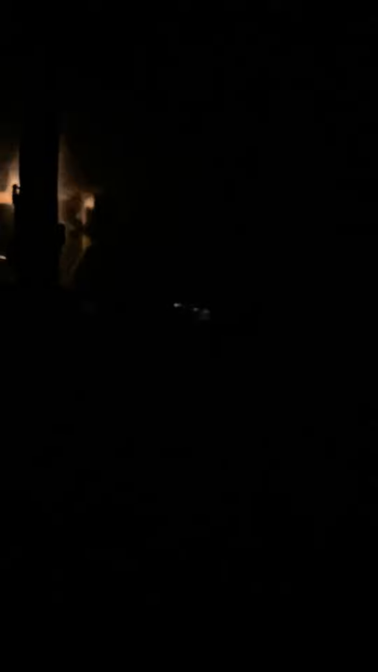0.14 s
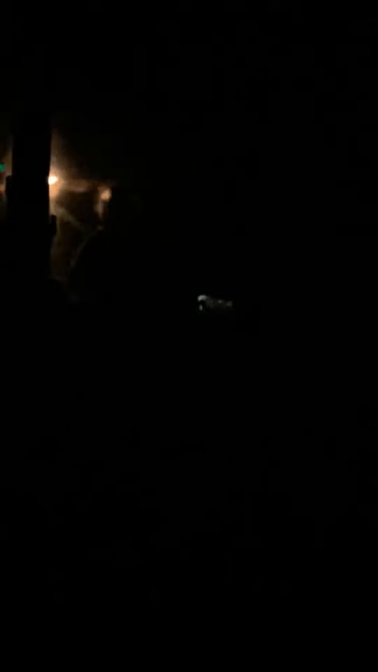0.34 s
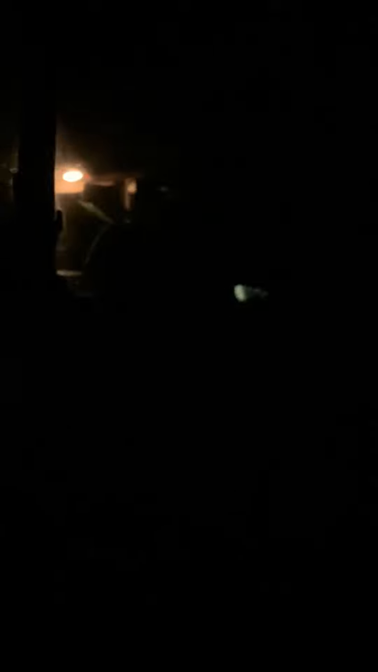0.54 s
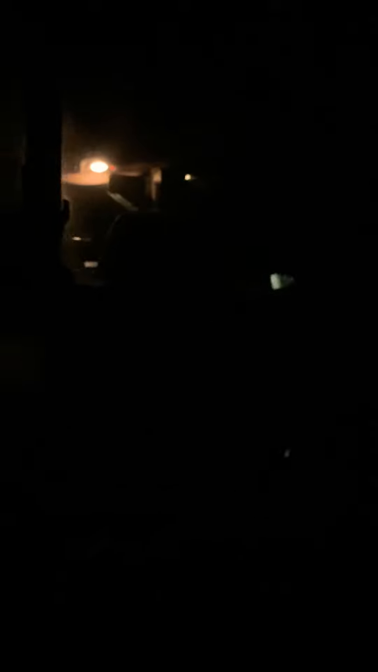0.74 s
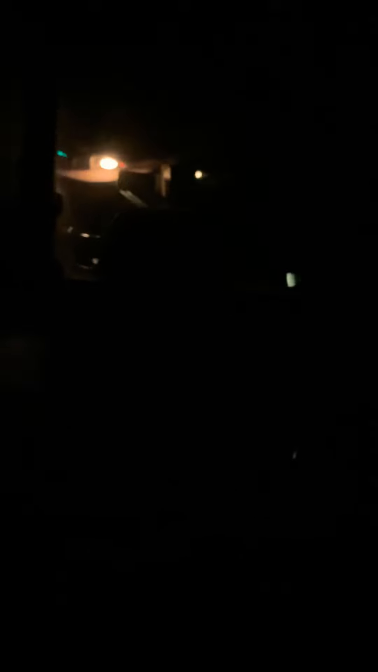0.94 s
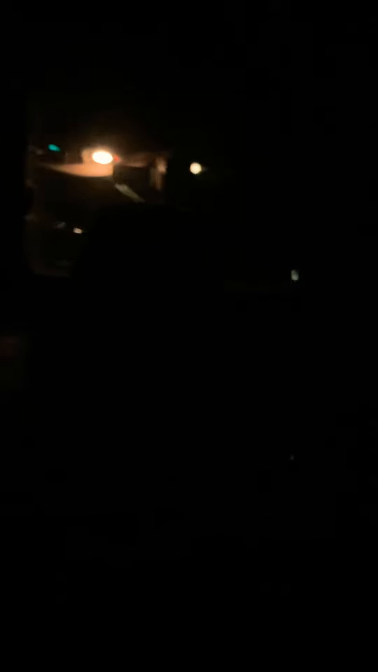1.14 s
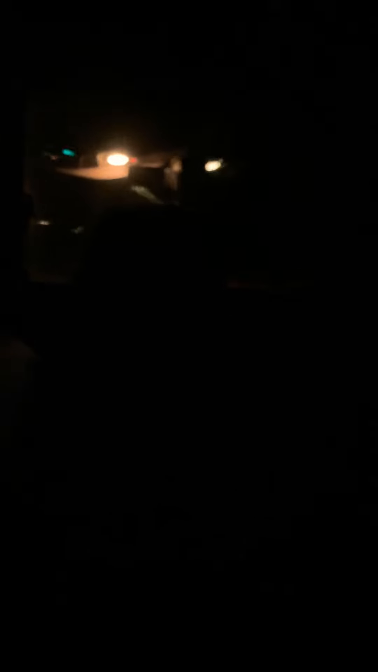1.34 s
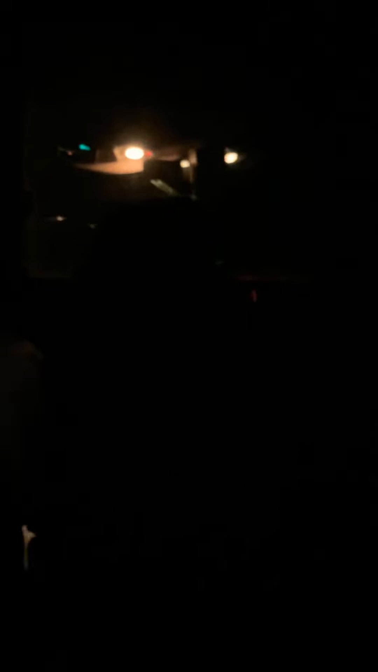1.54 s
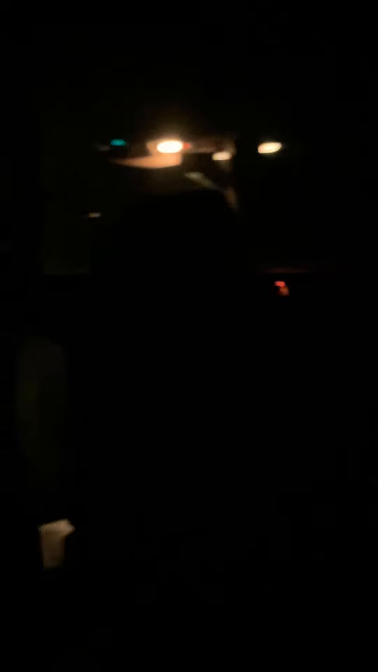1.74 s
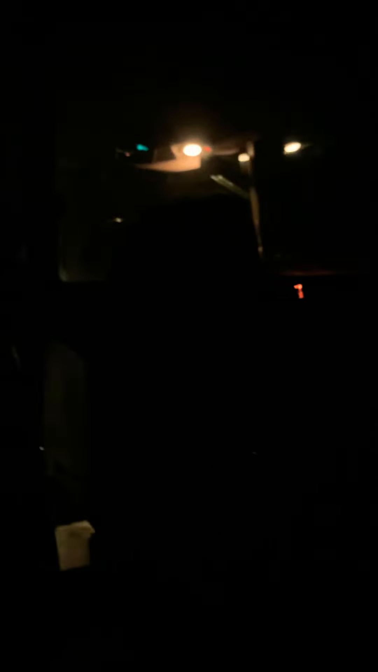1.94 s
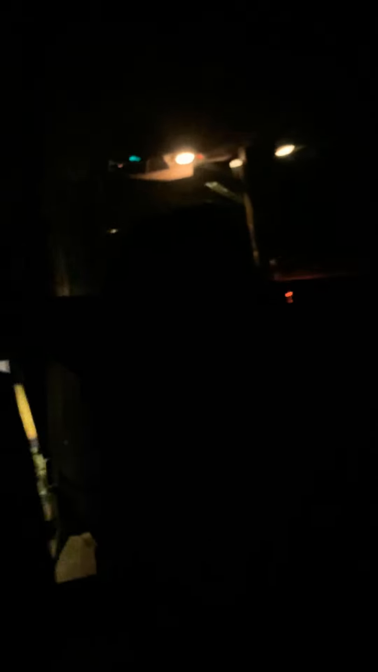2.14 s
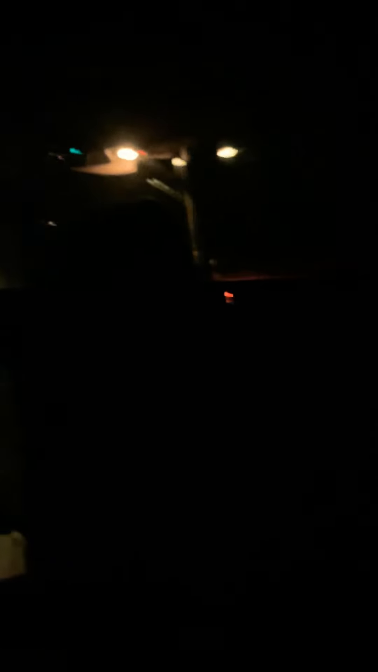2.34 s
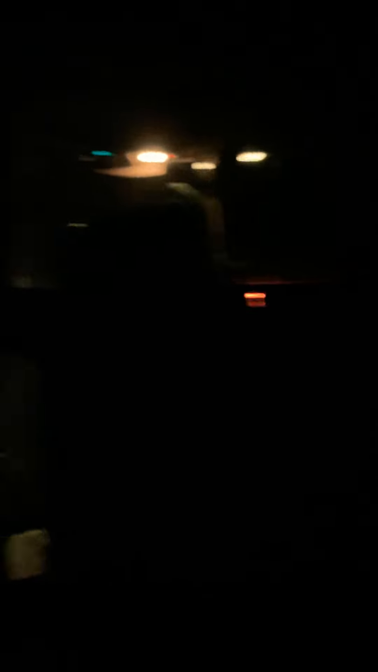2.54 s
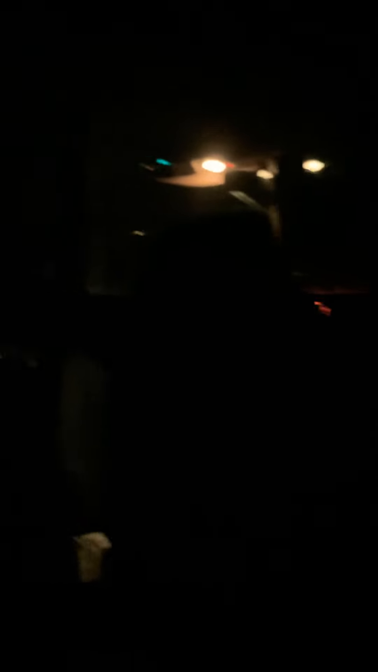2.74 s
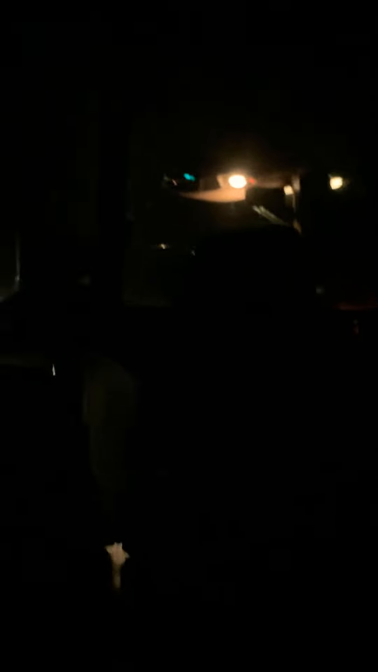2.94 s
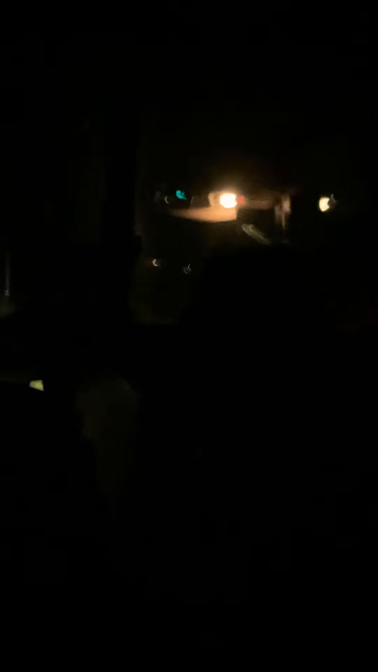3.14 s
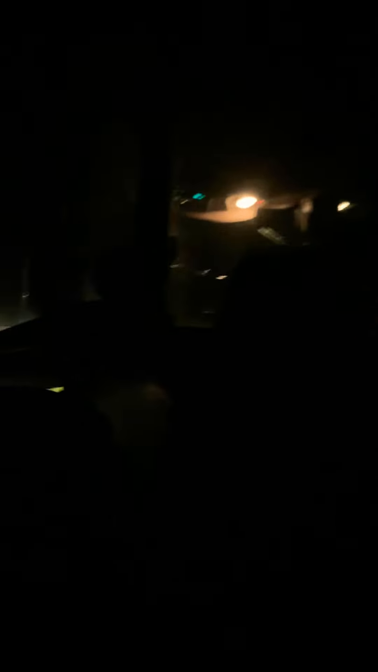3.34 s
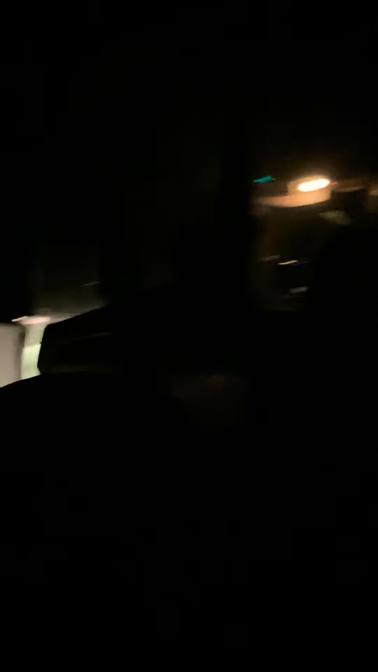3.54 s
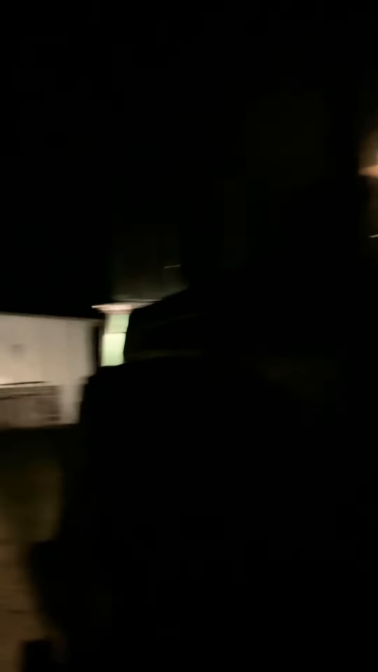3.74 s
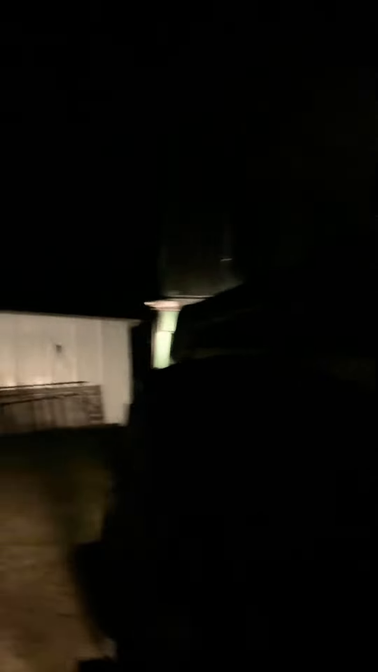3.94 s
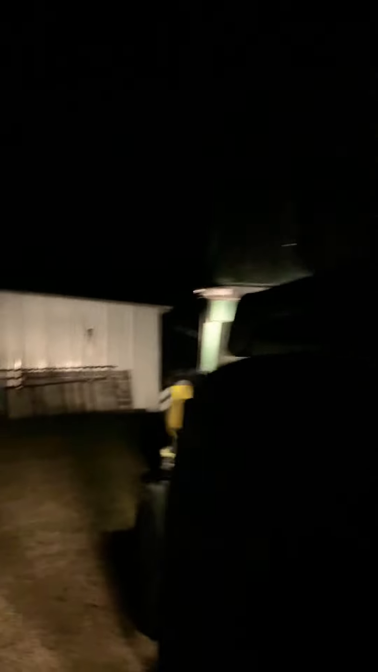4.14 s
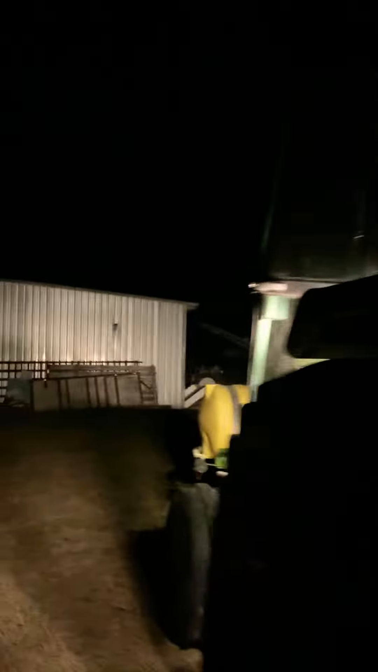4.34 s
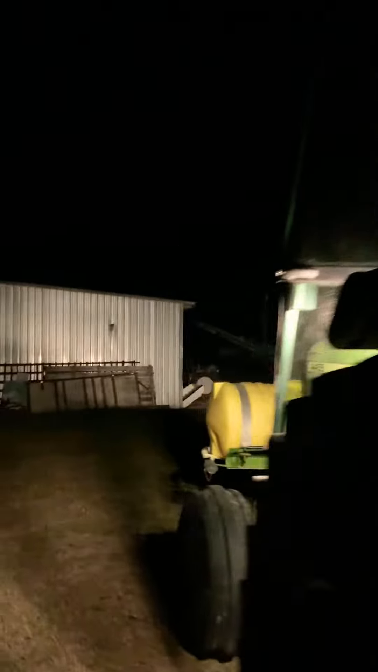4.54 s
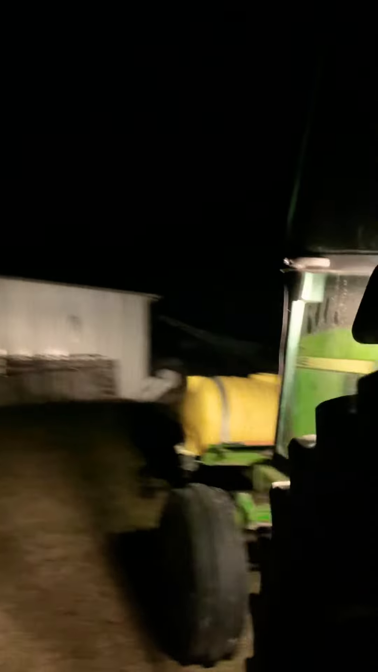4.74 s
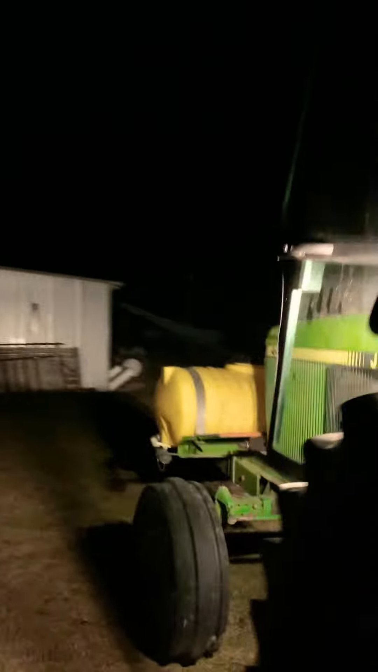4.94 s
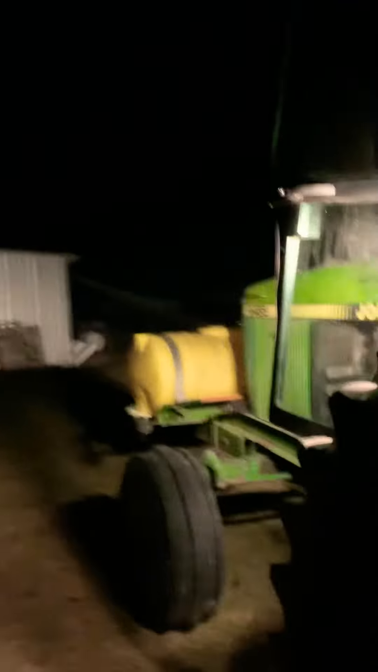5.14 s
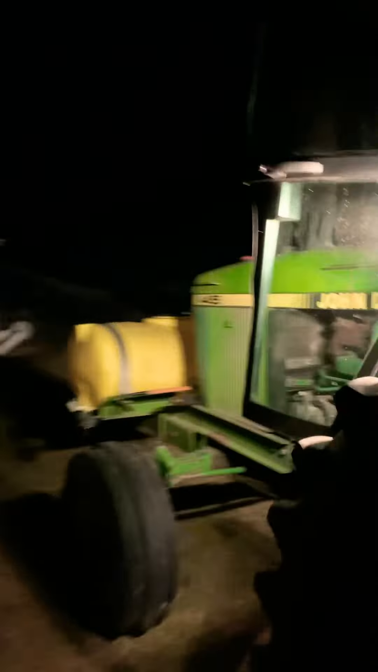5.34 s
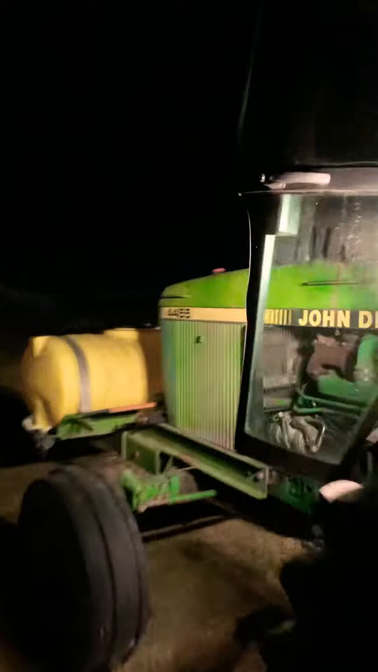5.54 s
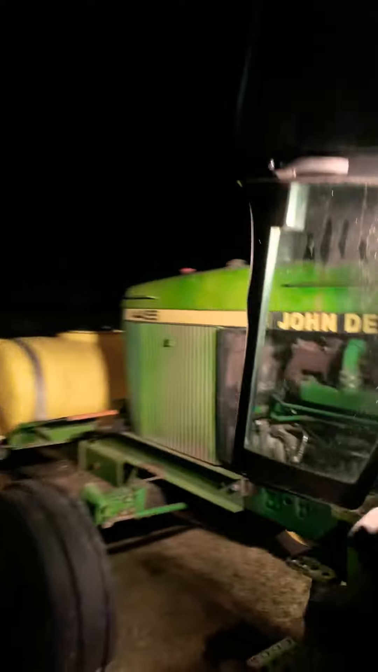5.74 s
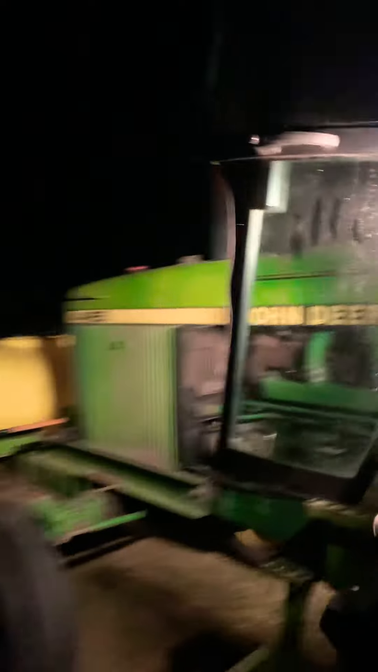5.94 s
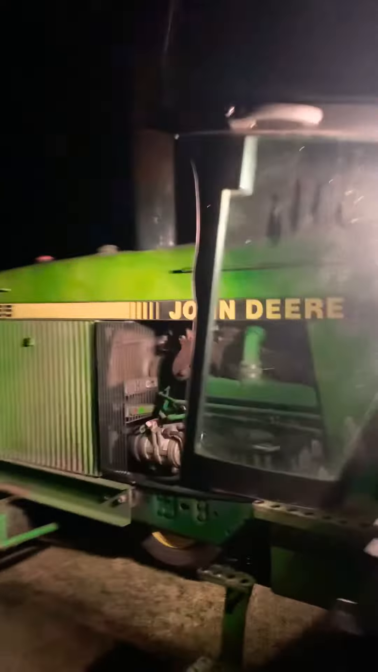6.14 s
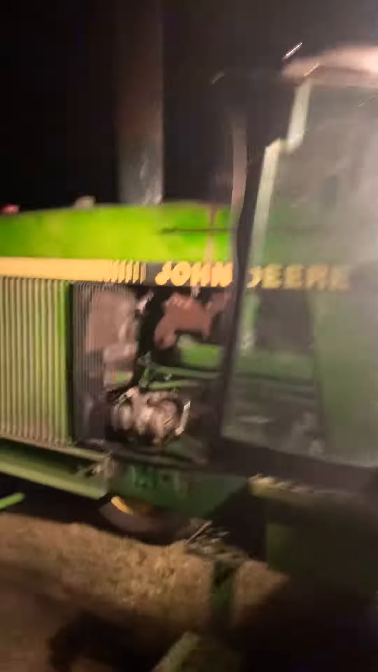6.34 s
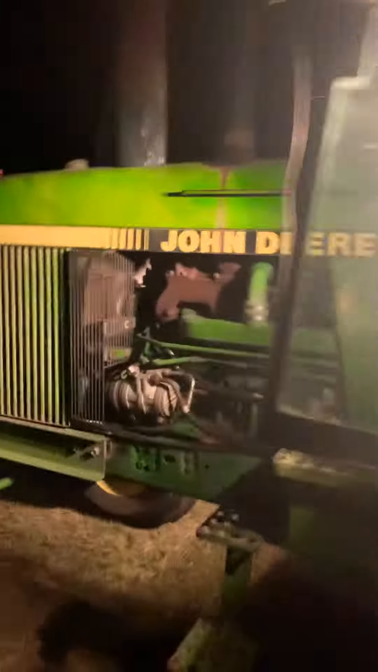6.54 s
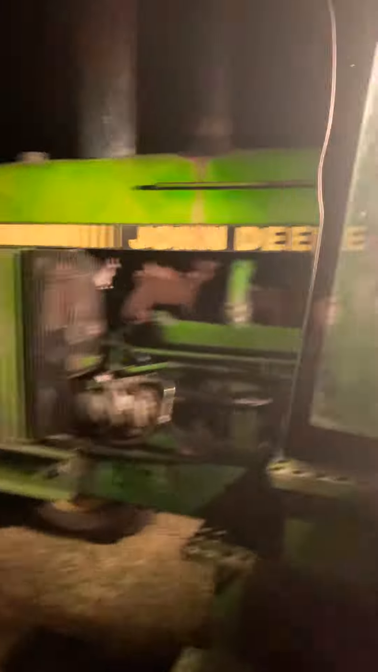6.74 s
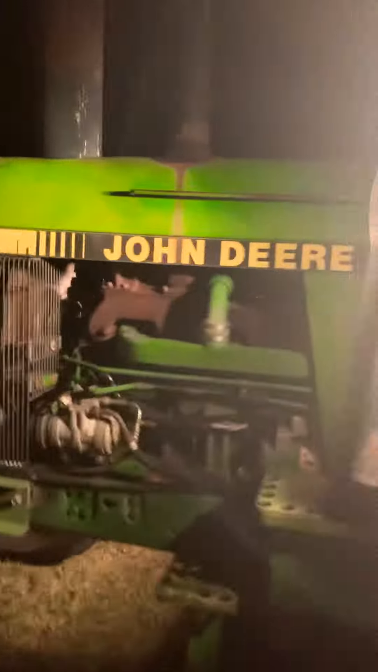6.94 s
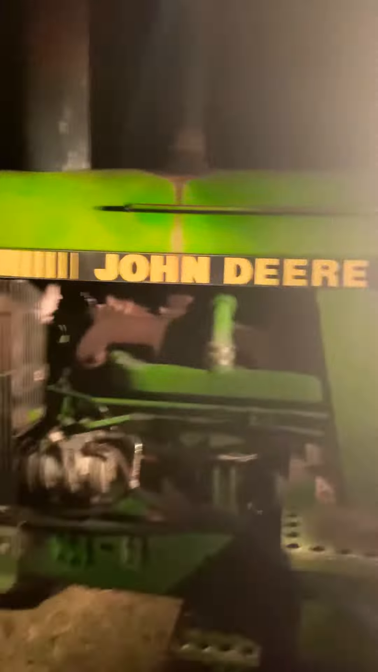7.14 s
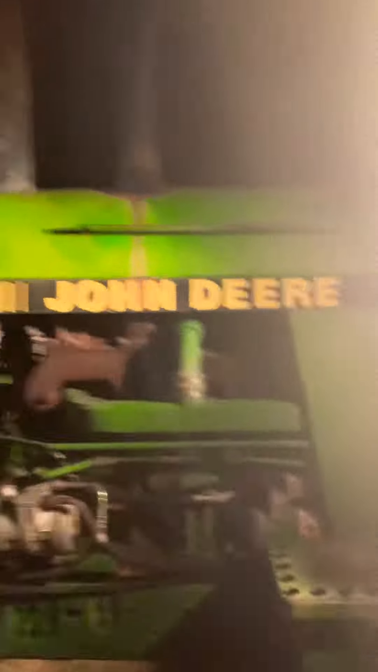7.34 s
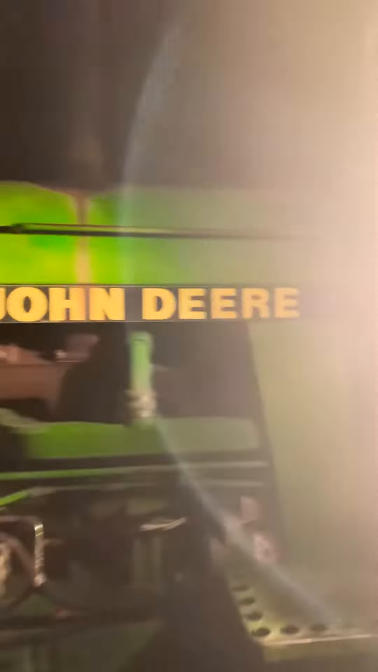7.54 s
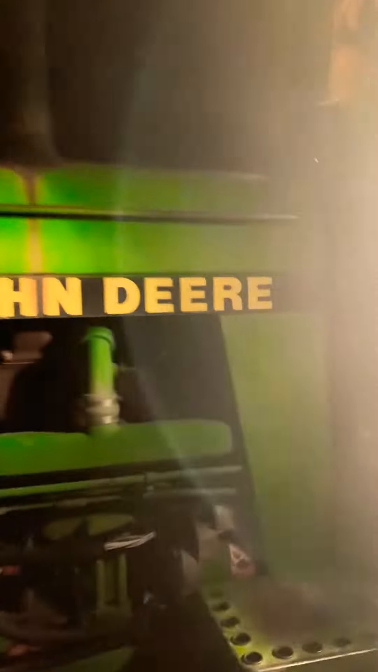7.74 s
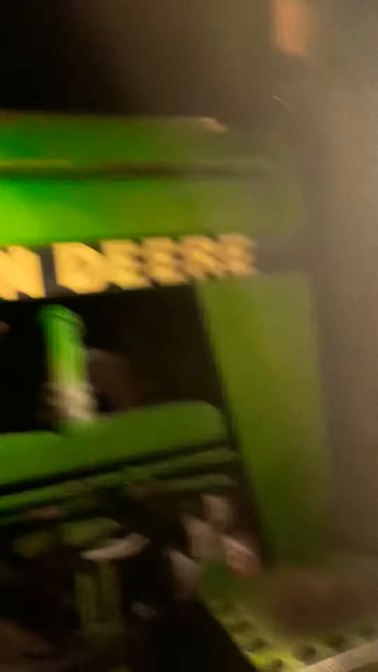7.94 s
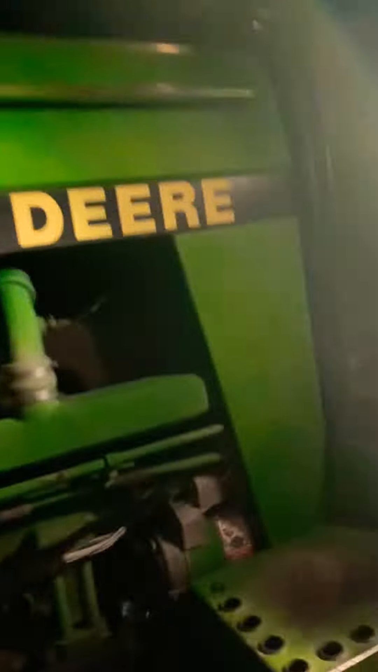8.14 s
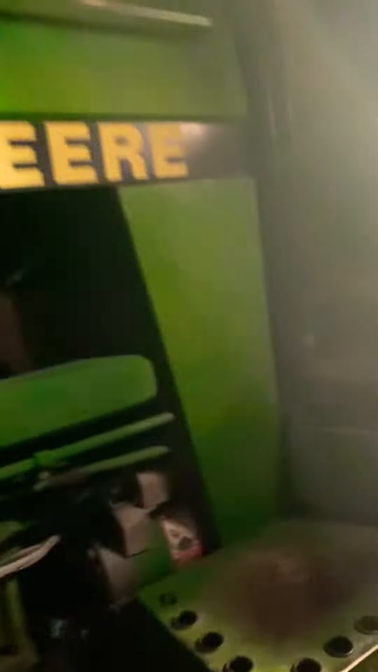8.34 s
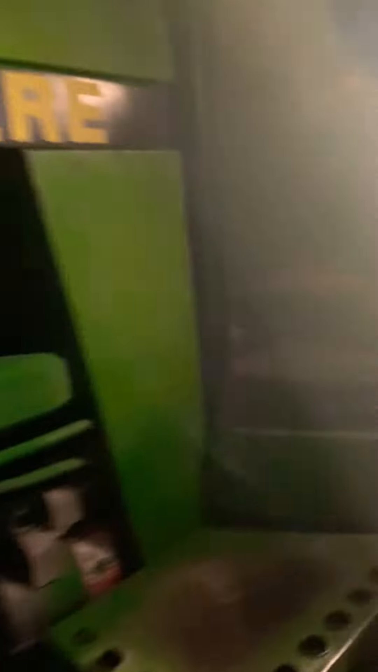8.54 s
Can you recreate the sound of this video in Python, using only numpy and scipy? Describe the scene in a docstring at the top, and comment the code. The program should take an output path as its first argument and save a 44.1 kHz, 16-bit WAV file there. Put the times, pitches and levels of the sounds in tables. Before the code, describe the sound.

A six-cylinder diesel tractor idles at an almost constant slow speed throughout, in an open yard at night, heard on a handheld phone with two closely spaced microphones. From 0 to about 3.5 s the phone is roughly four metres away behind the machine: a low exhaust drone, deep rumble, dull rapid knocking and distant pump rattle, with a wavering gear whine. Between 4 and 5.5 s it moves past the wheel and cab; the low boom rises while the rattle is partly screened, and hollow panel resonances swell briefly. From about 6 s the open engine bay is near: louder, harder knocks, dull piston slap, injector ticking and bright valve clatter. From 6.5 s sharp pump snaps recur about six times a second, with small metallic clinks near 7, 7.9, 8.2 and 8.5 s. The idle is still running when it cuts off around 8.6 s.

```python
"""An exhaust drone over a deep rumble: a six-cylinder diesel tractor idles in a yard at night.
A phone is carried from behind it up to the engine; most layers grow as the distance shrinks.
Crank-locked tones make the drone, gear whine and hums; noise bursts at set crank angles make the rumble,
knock, pump rattle and, close by, piston slap, injector ticks and valve clatter. Noise makes a faint hiss,
snaps and clinks; decaying sines make the hard knocks. Two closely spaced microphones pick it up."""
import sys
import numpy as np
from scipy import signal
from scipy.fft import rfft, irfft, next_fast_len
from scipy.io import wavfile
from scipy.ndimage import map_coordinates

SR = 44100
rng = np.random.default_rng(int(sys.argv[2]) if len(sys.argv) > 2 else 0)


def wav_out(sig):
    """Save sig, one row per channel (or a flat mono array), as 16-bit PCM at SR to the path in sys.argv[1]."""
    wavfile.write(sys.argv[1], SR, np.round(np.clip(np.atleast_2d(sig).T, -1, 1) * 32767).astype(np.int16))


N = 377937
TIME = np.arange(N) / SR


def amp(db):
    """Decibels to gain."""
    return 10 ** (np.asarray(db) / 20)


def unit(x):
    """Scale to rms 1."""
    return x / np.sqrt(np.mean(x ** 2) + 1e-20)


def along(points, hz):
    """Read (frequency [Hz], value) points on a log frequency axis."""
    f, v = np.transpose(points)
    return np.interp(np.log(hz + 1), np.log(f + 1), v)


def curve(points):
    """Interpolate (time [s], value) points to one value per sample."""
    return np.interp(TIME, *np.transpose(points))


def bell(x, centre, half):
    """Gaussian hump of height 1, down to 1/e at half from the centre."""
    return np.exp(-((x - centre) / half) ** 2)


def wobble(rate_hz):
    """Smooth random curve with rate_hz knots per second."""
    coarse_s = TIME[::64]
    knots = rng.standard_normal(int(N * rate_hz / SR) + 4)
    return np.interp(TIME, coarse_s, map_coordinates(knots, [coarse_s * rate_hz]))


def filtered(x, response):
    """Multiply the spectrum of x by a response of frequency."""
    size = next_fast_len(N + SR // 2)
    hz = np.fft.rfftfreq(size, 1 / SR)
    return irfft(rfft(x, size) * response(hz), size)[..., :N]


def coloured(x, spectrum):
    """Filter x by (frequency [Hz], level [dB]) points, then scale to rms 1."""
    return unit(filtered(x, lambda hz: amp(along(spectrum, hz))))


# the walk: (time [s], distance to the engine [m])
DISTANCE_M = [(0, 4.3), (2.3, 3.94), (3.4, 3.6), (4.3, 2.82), (5.2, 2.15), (6.1, 1.43), (7, 1.02),
              (7.4, 1.17), (7.8, 1.22), (8.57, 1.28)]


def spreading(near_db, loss_db):
    """Gain along the walk: near_db at 1 m, loss_db lost per doubling of the distance."""
    return amp(near_db - loss_db * np.log2(curve(DISTANCE_M)))


# how openly the engine bay faces the phone: (time [s], share [0-1])
OPEN_SHARE = [(0, 0), (3.5, .03), (4.2, 0.11), (4.7, 0.25), (5.4, 0.35), (6.2, 0.75), (7, 0.95),
              (8.57, 0.88)]


def approach(far, near):
    """Power blend from the sound behind the tractor to the sound beside the engine."""
    share = np.clip(curve(OPEN_SHARE), 0, 1)
    return np.sqrt(1 - share) * far + np.sqrt(share) * near


def reflections(x, depth_db, width_hz, life_s):
    """Crossing reflections lift and sink narrow bands at random; the pattern drifts with time."""
    hz, t, z = signal.stft(x, SR, nperseg=2048)
    knots = rng.standard_normal((1200, 80))
    places = np.meshgrid(hz / width_hz, t / life_s, indexing="ij")
    field = map_coordinates(knots, places, order=2, mode="mirror")
    shaped = signal.istft(z * amp(depth_db * field), SR, nperseg=2048)[1]
    return unit(shaped[:, :N])


def blows(cycle, pattern, t60_s, rise_s, alike, scatter_db, wash_db):
    """Noise bursts at fixed crank angles over a steady wash, on two paths; each cycle resembles the last."""
    size = SR // 6
    t = np.arange(size) / SR
    burst = (1 - np.exp(-t / rise_s)) * amp(-60 * t / t60_s)
    cycles = int(cycle[-1]) + 1
    power = np.zeros(N + size)
    for angle_deg, db in pattern:
        for turn in np.arange(cycles) + angle_deg / 720:
            start = np.searchsorted(cycle, turn)
            gain = amp(db + scatter_db * rng.standard_normal())
            power[start:start + size] += (gain * burst) ** 2
    envelope = np.sqrt(power[:N] / power[:N].mean() + amp(wash_db) ** 2)
    # likeness between cycles draws fine spectral lines about 6 Hz apart
    alike = np.clip(alike, 0, .95)
    shapes = rng.standard_normal((cycles, 2, size))
    for k in range(1, cycles):
        shapes[k] = alike * shapes[k - 1] + np.sqrt(1 - alike ** 2) * shapes[k]
    position = (cycle % 1 * size).astype(int)
    noise = shapes[cycle.astype(int), :, position].T
    return unit(envelope * noise)


def tone(cycle, order, waver_db, drift_rad, rate_hz):
    """Sine at a multiple of the cycle rate, unsteady in level and phase, at rms 1."""
    phase = 2 * np.pi * (np.round(order) * cycle + rng.random()) + drift_rad * wobble(rate_hz)
    return unit(np.sin(phase) * amp(waver_db * wobble(rate_hz)))


def ringing(modes):
    """Decaying sines of some modes after one blow, with peak 1."""
    t = np.arange(SR // 10) / SR
    modes_sum = sum(amp(db - 60 * t / t60_s) * np.sin(2 * np.pi * hz * t) for hz, t60_s, db in modes)
    ring = (1 - np.exp(-t / .002)) * modes_sum
    return ring / np.abs(ring).max()


def struck(events, rise_s, life_s):
    """Envelope of single blows, each rising and dying away exponentially."""
    envelope = np.zeros(N)
    for s, db in events:
        age = np.maximum(TIME - s, 0)
        envelope += amp(db) * (np.exp(-age / life_s) - np.exp(-age / life_s - age / rise_s))
    return envelope


# idle speed: (time [s], speed [rev/min])
SPEED_RPM = [(0, 720.3), (2.2, 718.5), (3.8, 722.3), (6.2, 721.1), (8.57, 720.8)]


def crank():
    """Engine cycles elapsed; one four-stroke cycle takes two turns."""
    return np.cumsum(curve(SPEED_RPM)) / (2 * 60 * SR)


# third firing harmonic: (time [s], level [dB])
BOOM = [(4.15, -31.5), (4.9, -23.5), (6.1, -21.5), (6.9, -23.5), (7.7, -23.5), (8.05, -27), (8.35, -21.5),
        (8.57, -27)]
# lines between the firing harmonics from unequal cylinders: (multiple of the cycle rate, level [dB])
UNEVEN = [(8, -44), (9, -40.5), (10, -46.5), (16, -40), (17, -44), (19, -45), (20, -41)]
BEAT_DB, BEAT_PERIOD_S, BEAT_CREST_S = -43, 0.823, 2.005


def exhaust(cycle):
    """Six firings a cycle leave the muffler as low harmonics; a line just beside the third beats with it."""
    first = amp(-39.0) * tone(cycle, order=6, waver_db=3.5, drift_rad=.1, rate_hz=12)
    second = tone(cycle, order=12, waver_db=1.0, drift_rad=.06, rate_hz=14)
    second = spreading(near_db=-20, loss_db=6.9) * second
    third = signal.hilbert(tone(cycle, order=18, waver_db=0.7, drift_rad=0.069, rate_hz=14))
    slip = np.exp(-2j * np.pi * (TIME - BEAT_CREST_S) / BEAT_PERIOD_S)
    throb = np.real(third * (amp(curve(BOOM)) + amp(BEAT_DB) * slip))
    lope = sum(amp(db) * tone(cycle, order=k, waver_db=2, drift_rad=0.6, rate_hz=5) for k, db in UNEVEN)
    return first + second + throb + lope


# thumps in one cycle: (crank angle [deg], relative level [dB])
FIRINGS = [(55, -4), (180, -4.5), (305, -5.5), (420, -4.5), (548, -5.5), (660, -5)]
# rumble spectra behind and beside the engine: (frequency [Hz], level [dB])
RUMBLE_FAR = [(70, -44), (135, 0), (175, -2.5), (200, -3), (250, 0), (305, 1), (345, -5.5), (385, -5.5),
              (440, -2.5), (500, -8.5), (750, -63)]
RUMBLE_NEAR = [(70, -19), (135, 2.5), (175, 2.5), (200, -2.5), (250, -5), (305, -5), (345, 2), (385, -5),
               (440, 4), (500, -1), (750, -37.5)]


def block(cycle):
    """Each firing thumps the block and hood."""
    thumps = blows(cycle, FIRINGS, t60_s=.09, rise_s=.003, alike=.66, scatter_db=.5, wash_db=3.5)
    return amp(-1.36) * approach(coloured(thumps, RUMBLE_FAR), coloured(thumps, RUMBLE_NEAR))


# prominent gear tones and engine harmonics, relative to the rumble's distance gain:
# (multiple of the cycle rate, level from behind [dB], level beside the engine [dB])
GEARS = [(30, -14, -18), (36, -14.5, -21), (41, -14, -25), (42, -16, -19), (50, -14, -27), (52, -13, -17),
         (58, -28, -20), (68, -15, -17), (77, -29, -15)]
# timing gear whine: (time [s], level [dB])
WHINE = [(0, -39), (.4, -37.5), (1, -49), (1.8, -40), (2.3, -34.5), (3, -49), (3.35, -40), (3.75, -48),
         (4.1, -34), (6.3, -35.5), (7, -31), (7.5, -35), (8.3, -31)]


def gears(cycle):
    """Meshing tones and engine harmonics waver; the timing gears' whine comes and goes along the walk."""
    lines = np.zeros(N)
    for k, far_db, near_db in GEARS:
        line = tone(cycle, order=k, waver_db=2.5, drift_rad=0.45, rate_hz=2.96)
        lines += approach(amp(far_db), amp(near_db)) * line
    whine = amp(curve(WHINE)) * tone(cycle, order=76, waver_db=2, drift_rad=.5, rate_hz=7)
    return spreading(near_db=-21.5, loss_db=2.71) * lines + whine


# ringing modes of the block: (frequency [Hz], t60 [s], level [dB])
IRON = [(885, 0.046, -13.5), (979, .05, -10.5), (1168, 0.044, -19), (1414, .04, -20.5),
        (1602, 0.061, -14.5), (1639, 0.073, -13.5), (2340, 0.073, -23)]


def rung(x):
    """Pass x through the ringing modes of the iron, at rms 1."""
    return unit(signal.fftconvolve(x, ringing(IRON)[None], axes=1)[:, :N])


# knocks in one cycle: (crank angle [deg], relative level [dB])
KNOCKS = [(45, 0.5), (150, 0.5), (182, -1), (290, -4), (400, -2), (530, -1), (648, 0)]
# knock spectra behind and beside the engine: (frequency [Hz], level [dB])
KNOCK_FAR = [(380, -32), (550, 2), (650, -2), (780, -4), (950, -1), (1150, -4), (1400, -6), (1630, -6),
             (1850, -11.5), (2050, -8.5), (2330, -8), (3200, -85)]
KNOCK_NEAR = [(380, -60), (550, 0.5), (650, 3), (780, -5), (950, -1.5), (1150, -4.5), (1400, -1.5),
              (1630, -6), (1850, -4), (2050, -9), (2330, -7), (3200, -72)]
# the rear wheel and cab screen the engine as the phone passes; the rattle loses most
SHADOW_S, SHADOW_HALF_S = 4.93, 1
KNOCK_SHADOW_DB, RATTLE_SHADOW_DB = -3, -7.5


def knock(cycle):
    """Diesel knock: the sudden pressure rise rings the iron, in some cylinders harder."""
    far = blows(cycle, KNOCKS, t60_s=0.17, rise_s=0.002, alike=0.65, scatter_db=1.8, wash_db=.5)
    near = blows(cycle, KNOCKS, t60_s=.08, rise_s=.0012, alike=.52, scatter_db=1.5, wash_db=0)
    far = reflections(far, depth_db=2.6, width_hz=42, life_s=0.25)
    near = reflections(near, depth_db=2.4, width_hz=55, life_s=0.25)
    hits = blows(cycle, KNOCKS, t60_s=0.045, rise_s=0.0006, alike=0.3, scatter_db=1.8, wash_db=-5)
    behind = amp(-0.7) * coloured(far, KNOCK_FAR)
    beside = amp(-2.5) * coloured(near, KNOCK_NEAR) + amp(-10) * rung(hits)
    exposure = amp(KNOCK_SHADOW_DB * bell(TIME, SHADOW_S, SHADOW_HALF_S))
    return exposure * approach(behind, beside)


# hydraulic pump and injector blows in one cycle: (crank angle [deg], relative level [dB])
PUMP = [(80, 5), (125, 5), (165, 6.5), (215, -8), (255, 10), (310, -12), (445, 7), (490, -3), (532, 6),
        (575, 0), (618, 8.5), (670, -11)]
INJECTORS = [(42, 4.5), (92, -1), (143, 7), (165, 9.5), (275, -17), (402, 6.5), (520, -7), (575, 1.5),
             (628, 8)]
# rattle spectra behind and beside the engine: (frequency [Hz], level [dB])
RATTLE_FAR = [(1800, -12.5), (2500, 0.5), (2850, -10.5), (3240, -1), (3450, -6.5), (3680, 1.3), (4300, -13),
              (5200, -15.5), (6200, -16), (7100, -16.5), (8200, -21), (10100, -18), (10800, -23),
              (15500, -35)]
RATTLE_NEAR = [(1800, -6), (2500, -4.5), (2850, -1.5), (3240, -0.5), (3450, -3), (3680, -1.5), (4300, 2.5),
               (5200, -5.5), (6200, -6), (7100, -10.5), (8200, -10), (10100, -14), (10800, -11),
               (15500, -19)]
# lift of the rattle when level with the injectors
INJECTOR_S, INJECTOR_HALF_S, INJECTOR_DB = 8.45, 0.87, 2


def rattle(cycle):
    """The pump's pistons rattle from afar; close by, injector ticks stand over a steady noise wash."""
    pump = blows(cycle, PUMP, t60_s=0.1, rise_s=0.001, alike=0.42, scatter_db=1.6, wash_db=2)
    ticks = blows(cycle, INJECTORS, t60_s=0.065, rise_s=.002, alike=0.15, scatter_db=2.3, wash_db=4)
    pump = reflections(pump, depth_db=3, width_hz=65, life_s=0.22)
    ticks = reflections(ticks, depth_db=2.8, width_hz=80, life_s=.2)
    shadow_db = RATTLE_SHADOW_DB * bell(TIME, SHADOW_S, SHADOW_HALF_S)
    lift_db = INJECTOR_DB * bell(TIME, INJECTOR_S, INJECTOR_HALF_S)
    behind = amp(0.08) * coloured(pump, RATTLE_FAR)
    beside = amp(-0.4) * coloured(ticks, RATTLE_NEAR)
    return amp(shadow_db + lift_db) * approach(behind, beside)


# hiss spectrum: (frequency [Hz], level [dB])
HISS = [(3800, -34), (5200, 2), (7500, 5), (9000, -22), (14000, -26)]


def hiss():
    """A faint steady hiss around 5-8 kHz, filtered noise that grows as the distance shrinks."""
    return spreading(near_db=-43, loss_db=6.3) * coloured(rng.standard_normal((2, N)), HISS)


# piston slaps in one cycle: (crank angle [deg], relative level [dB])
SLAPS = [(32, 2), (95, 1), (160, -4), (205, 0.24), (368, -1), (418, -0.5), (475, 3), (526, 2), (560, 0),
         (694, 3.5)]
# slap spectrum: (frequency [Hz], level [dB])
SLAP = [(330, -29), (520, 1.5), (700, -4), (980, -1.5), (1250, -7), (2200, -38)]


def slap(cycle):
    """Pistons slap their liners: short dull clacks, partly alike from cycle to cycle."""
    clacks = blows(cycle, SLAPS, t60_s=.06, rise_s=.0018, alike=.52, scatter_db=1, wash_db=0)
    return spreading(near_db=-25.5, loss_db=7.4) * approach(0, coloured(clacks, SLAP))


# valve closings in one cycle: (crank angle [deg], relative level [dB])
VALVES = [(8, 2), (42, -9), (103, 8), (146, -6), (222, 4), (283, 9.5), (337, -1), (372, -1), (398, 3),
          (438, 3), (492, 6), (513, 5)]
# valve spectrum: (frequency [Hz], level [dB])
VALVE = [(2500, -25), (4000, -12), (7000, -2), (9800, 6), (12000, -1), (16000, -3)]


def valves(cycle):
    """Twelve valves close in turn: a bright clatter that grows as the engine bay opens to the phone."""
    taps = blows(cycle, VALVES, t60_s=.032, rise_s=.0009, alike=.2, scatter_db=2.5, wash_db=-8)
    gain = amp(-36) / curve(DISTANCE_M) * np.clip(curve(OPEN_SHARE), 0, 1)
    return gain * coloured(taps, VALVE)


# brief booms: (time [s], half length [s], multiple of the cycle rate, level [dB])
HUMS = [(.4, .25, 40, -34.5), (1.3, .5, 51, -39), (2.2, .5, 92, -44), (2.45, .1, 233, -41),
        (3.7, .3, 52, -34), (3.45, .35, 51, -38), (3.65, .15, 156, -42), (4.05, .25, 233, -42),
        (4.45, .3, 42, -31), (4.85, .2, 26, -32.5), (4.85, .3, 155, -38), (7.15, .1, 161, -29),
        (8.2, .3, 171, -36), (4.95, .12, 232, -40), (5.75, .3, 50, -31), (5.95, .35, 72, -32.5),
        (5.95, .08, 250, -36), (6.1, .4, 68, -32), (6.15, .4, 392, -42), (6.7, .5, 31, -34),
        (5.2, .35, 47, -35), (5.5, .5, 48, -27.5), (7.4, .12, 146, -31), (7.55, .17, 58, -25),
        (8.35, .2, 58, -31.5)]


def hums(cycle):
    """Single engine harmonics boom briefly where the phone crosses their standing waves."""
    total = np.zeros(N)
    for s, half_s, k, db in HUMS:
        line = tone(cycle, order=k, waver_db=2, drift_rad=0.5, rate_hz=8)
        total += amp(db) * bell(TIME, s, half_s) * line
    return total


# resonances of parts passed in turn: (frequency [Hz], half width [Hz], lift [dB])
FENDER = [(552, 25, 6.6)]
CAB = [(174, 30, 1), (252, 10, -4), (636, 46, 4.5), (935, 40, 4.5), (1238, 11, 12.5), (1396, 14, 8)]
HOOD = [(155, 18, 0), (288, 16, 3.5), (340, 30, -7), (560, 25, 4), (697, 10, 8.5)]
MANIFOLD = [(189, 18, 4.3), (610, 100, 2.2), (1610, 60, 2.4)]
FUEL_LINE = [(7070, 390, 10.3)]
# low rumble thins near the end: (frequency [Hz], half width [Hz], lift [dB])
THINNING = [(224, 85, -5.5)]


def panels(x):
    """Bands of fender, cab, hood, manifold and fuel line swell, and a few sink, as the phone passes."""
    hz, t, z = signal.stft(x, SR, nperseg=4096)

    def passing(modes, at_s, half_s):
        """Lift in dB of one set of bands around a moment."""
        spectrum_db = sum(db * bell(hz, centre, width) for centre, width, db in modes)
        return np.outer(spectrum_db, bell(t, at_s, half_s))

    lift_db = (passing(FENDER, at_s=2.1, half_s=0.42) + passing(CAB, at_s=4.78, half_s=0.73)
               + passing(HOOD, at_s=5.72, half_s=0.75) + passing(MANIFOLD, at_s=6.65, half_s=0.4)
               + passing(FUEL_LINE, at_s=8.31, half_s=0.2) + passing(THINNING, at_s=8.34, half_s=0.25))
    return signal.istft(z * amp(lift_db), SR, nperseg=4096)[1][:, :N]


# harder combustion knocks: (time [s], peak of the low modes [dB], peak of the high modes [dB])
HARD = [(6.313, -24, -18), (6.369, -14.5, -16.5), (6.479, -23, -18), (6.529, -16, -15.5),
        (6.645, -24, -11.5), (6.813, -25, -12.5), (6.863, -18, -18), (6.980, -18, -13), (7.029, -17, -12.5),
        (7.193, -16, -14), (7.698, -17.5, -18), (7.864, -24, -18), (8.135, -25, -19), (8.306, -17.5, -12)]
LOW_MODES_HZ = 1300  # splits the iron's modes into low and high


def hard_knocks():
    """Single hard combustion knocks ring the iron, each with its own mix of low and high modes."""
    low = ringing([mode for mode in IRON if mode[0] < LOW_MODES_HZ])
    high = ringing([mode for mode in IRON if mode[0] >= LOW_MODES_HZ])
    hard = np.zeros(N)
    for s, low_db, high_db in HARD:
        hard[round(s * SR):][:len(low)] += amp(low_db) * low + amp(high_db) * high
    return hard


# injection pump snaps: (time [s], envelope level [dB])
SNAPS = [(6.463, -23), (6.629, -19), (6.7955, -16.5), (6.962, -17.5), (7.129, -18), (7.295, -24),
         (7.461, -18), (7.628, -15.5), (7.794, -18), (7.96, -16.5), (8.1265, -19), (8.293, -20),
         (8.459, -16)]
# snap spectrum: (frequency [Hz], level [dB])
SNAP = [(3000, -24), (6000, -3), (11500, 2.5), (16000, -7)]


def snaps():
    """Close by, the injection pump snaps once a cycle: short bright noise bursts at listed times."""
    noise = coloured(rng.standard_normal((2, N)), SNAP)
    return struck(SNAPS, rise_s=0.00045, life_s=0.0039) * noise


# clinks: (time [s], relative level [dB])
CLINKS = [(7.029, -36), (7.860, -29), (8.168, -30), (8.525, -29)]
# clink spectrum: (frequency [Hz], level [dB])
FITTING = [(3000, -26), (6000, -6), (6750, 2), (7500, -7), (9700, -17), (15000, -34)]


def clinks():
    """A loose fitting clinks: a few short bursts of filtered noise."""
    noise = coloured(rng.standard_normal((2, N)), FITTING)
    return amp(10.5) * struck(CLINKS, rise_s=.0005, life_s=0.0075) * noise


# phase by which left leads right: (frequency [Hz], phase [rad])
LEAD_RAD = [(30, 0), (150, -.1), (280, -.3), (480, -.85), (900, -.55), (1150, -.6), (1400, 0), (1800, 0),
            (2050, .4), (2400, 1.2), (2800, 1.45), (3300, 1.4), (4720, 3.14), (8930, 9.42), (15400, 18.85)]
# left minus right: (frequency [Hz], level difference [dB])
BALANCE_DB = [(40, -.1), (130, -.7), (280, -.9), (450, -1.8), (560, -3.9), (880, -3.6), (1080, -1.1),
              (1200, -1.8), (1550, .1), (2350, -5.4), (3400, -.5), (4000, 0)]
# side that follows the mid: (frequency [Hz], share [0-1])
FOLLOW = [(100, 1), (1000, .85), (2600, .78), (3600, .84), (6000, .74), (14000, .68)]
# side from the yard's echoes: (frequency [Hz], level [dB])
DIFFUSE = [(30, -19), (70, -23), (140, -29), (280, -26), (550, -18), (1100, -14.5), (1550, -22),
           (2000, -11), (2600, -7), (3400, -18), (4500, -30), (9000, -30)]


def microphones(direct, scattered):
    """The gap between the microphones shifts sound between mid and side with frequency."""
    def half_lead(hz):
        return np.interp(hz, *np.transpose(LEAD_RAD)) / 2

    def follow(hz):
        return np.clip(along(FOLLOW, hz), 0, 1)

    def scatter(hz):
        loose = np.sin(half_lead(hz)) * np.sqrt(1 - follow(hz) ** 2)
        return np.hypot(loose, amp(along(DIFFUSE, hz)))

    mid = filtered(direct, lambda hz: np.cos(half_lead(hz)))
    side = filtered(direct, lambda hz: 1j * np.sin(half_lead(hz)) * follow(hz))
    side += filtered(scattered, scatter)
    # air moving over the ports
    air = coloured(rng.standard_normal(N), [(15, -20), (35, 2), (100, 0), (200, -24), (500, -70)])
    side += amp(-49.5) * air
    pair = np.array([mid + side, mid - side])
    return filtered(pair, lambda hz: amp(np.outer([.5, -.5], along(BALANCE_DB, hz))))


def scene():
    """One crank drives the cyclic sources; hiss and listed single blows join them."""
    cycle = crank()
    engine = spreading(near_db=-21.5, loss_db=2.71) * block(cycle) + gears(cycle)
    engine += spreading(near_db=-18.5, loss_db=5.81) * knock(cycle)
    engine += spreading(near_db=-23, loss_db=5.75) * rattle(cycle)
    engine += hiss() + slap(cycle) + valves(cycle)
    direct, scattered = panels(engine) + hard_knocks() + snaps() + clinks()
    return microphones(direct + exhaust(cycle) + hums(cycle), scattered)


CEILING, TOP_HZ = 0.95, 15850


def record(dry):
    """The highest peaks are rounded off softly and the sound ends above 15.85 kHz."""
    rounded = dry / (1 + np.abs(dry / CEILING) ** 10) ** (1 / 10)
    return filtered(rounded, lambda hz: hz < TOP_HZ)


dry = scene()
out = record(dry)
wav_out(out)
```